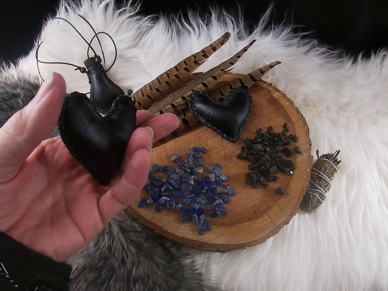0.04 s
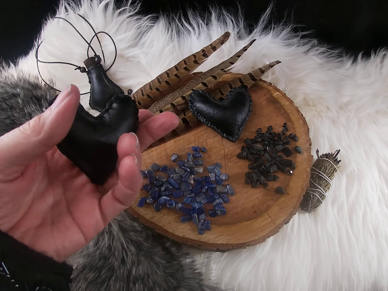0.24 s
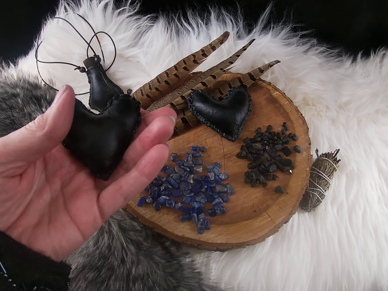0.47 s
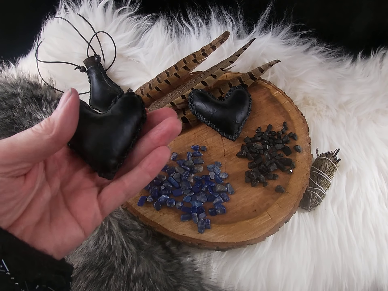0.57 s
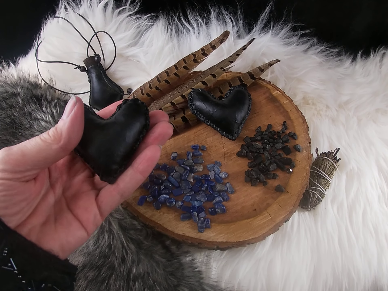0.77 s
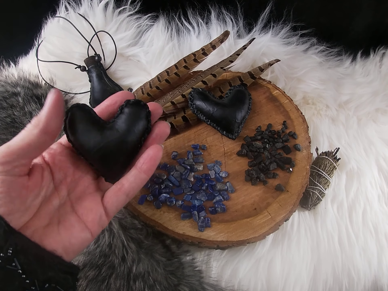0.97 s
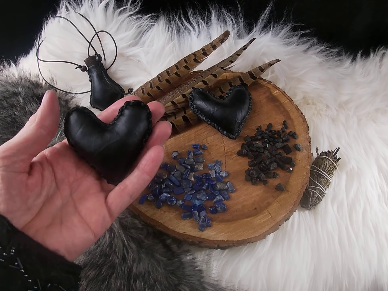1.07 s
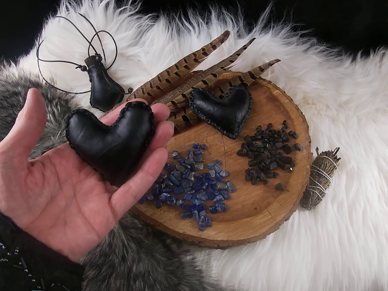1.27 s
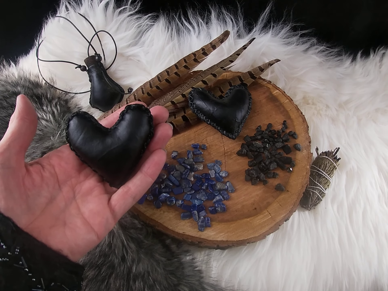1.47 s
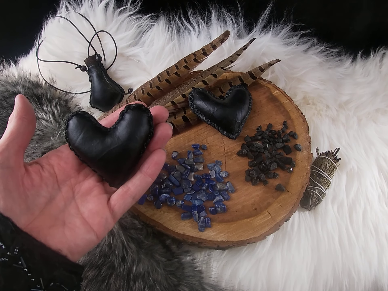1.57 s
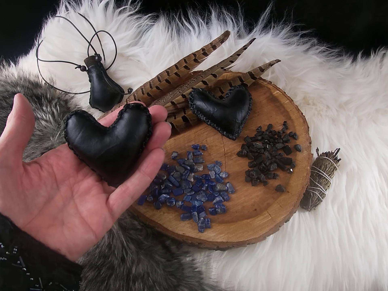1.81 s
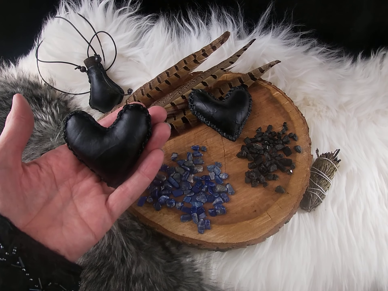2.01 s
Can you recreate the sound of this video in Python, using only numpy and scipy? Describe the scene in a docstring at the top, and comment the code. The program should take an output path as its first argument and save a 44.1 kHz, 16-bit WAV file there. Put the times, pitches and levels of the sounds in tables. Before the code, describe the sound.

Stone chips tumble inside a stiff leathery rattle held in the hand: a quick dense clatter, a few weak ticks, another brief sparse rattle, then only low room rumble and thin hiss, heard close and centred indoors.

```python
"""Rawhide rattle in an open palm

A small rawhide rattle is tipped about in an open palm, close by in a quiet room. Stone chips strike
the stiff hide in short runs of dry clicks: impulses with a brief scratch, filtered by the hide's resonances.
Smaller chips settle between them as random impulses, and the hide slides over the skin as shaped noise.
Rumble, hiss and a faint hum lie underneath, and a nearby echo and a short tail follow the chips."""
import sys
import numpy as np
from scipy import signal
from scipy.fft import rfft, irfft
from scipy.io import wavfile

SR = 44100
rng = np.random.default_rng(int(sys.argv[2]) if len(sys.argv) > 2 else 0)


def materialize(psi):
    """Save the field psi as 16-bit PCM at rate SR to the path in sys.argv[1].

    A 1-D psi becomes a single channel; in a 2-D psi each row is a channel.
    """
    bounded = np.clip(np.atleast_2d(psi).T, -1, 1)
    quanta = np.round(bounded * 32767).astype(np.int16)
    wavfile.write(sys.argv[1], SR, quanta)


N = 90404
TIME = np.arange(N) / SR


def from_db(db):
    """Logarithmic level: decibels to amplitude gain."""
    return 10 ** (np.asarray(db) / 20)


def unit(x):
    """Energy normalization: the squared samples sum to one."""
    return x / np.sqrt(np.sum(x ** 2) + 1e-20)


def rms_one(x):
    """Power normalization: the root mean square becomes one."""
    return unit(x) * np.sqrt(len(x))


def level(curve):
    """Amplitude envelope: gain over time from (time [s], level [dB]) points; silent after the last one."""
    return from_db(np.interp(TIME, *np.transpose(curve), right=-np.inf))


def noise(colour):
    """Spectral shaping: white noise weighted by (frequency [Hz], level [dB]) points, at an rms of one."""
    hz, db = np.transpose(colour)
    bins = np.maximum(np.fft.rfftfreq(N, 1 / SR), 1)
    gain = from_db(np.interp(np.log(bins), np.log(hz), db))
    spectrum = rfft(rng.standard_normal(N)) * gain * (bins > 10)
    return rms_one(irfft(spectrum, N))


def resonate(x, hz, width_hz):
    """Simple resonance: a two-pole filter with a gain of one at its top."""
    alpha = np.tan(np.pi * width_hz / SR)
    c = -2 * np.cos(2 * np.pi * hz / SR)
    return signal.lfilter([alpha, 0, -alpha], [1 + alpha, c, 1 - alpha], x + 1e-18)


def peak(x, hz, width_hz, db):
    """Parallel resonance: raises or lowers one region; its ringing time does not depend on its strength."""
    return x + (from_db(db) - 1) * resonate(x, hz, width_hz)


def band(x, low_hz, high_hz):
    """Band limitation: a Butterworth band-pass."""
    sos = signal.butter(2, [low_hz, min(high_hz, .45 * SR)], "band", fs=SR, output="sos")
    return signal.sosfilt(sos, x)


def edge(x, hz, kind, order):
    """Cutoff slope: a Butterworth high-pass or low-pass."""
    sos = signal.butter(order, min(hz, .45 * SR), kind, fs=SR, output="sos")
    return signal.sosfilt(sos, x + 1e-18)


# spectrum of the quiet room: (frequency [Hz], level [dB])
ROOM_NOISE_COLOUR = [(25, 1.5), (70, -13.5), (105, -20), (138, 2.5), (320, -10.5), (480, -25), (800, -20.5),
                     (1050, -25), (3800, -34), (5500, -30.5), (12500, -49), (16000, -65.5)]
ROOM_NOISE_DB = -60.5


def room_noise():
    """Stationary random noise: a low rumble under a thin hiss."""
    return from_db(ROOM_NOISE_DB) * noise(ROOM_NOISE_COLOUR)


# centres of the brief swells of deep rumble: (time [s])
SWELL_TIMES = [.07, .37, 1.21, 1.843]
SWELL_HZ, SWELL_LENGTH_S, SWELL_DB = 28, .04, -60


def deep_swells():
    """Amplitude modulation: an octave of deep noise under Gaussian envelopes."""
    swelling = sum(np.exp(-((TIME - s) / SWELL_LENGTH_S) ** 2) for s in SWELL_TIMES)
    rumble = band(rng.standard_normal(N), SWELL_HZ / np.sqrt(2), SWELL_HZ * np.sqrt(2))
    return from_db(SWELL_DB) * swelling * rms_one(rumble)


HUM_HZ, HUM_WIDTH_HZ, HUM_DB = 734, 4.2, -80


def faint_hum():
    """Narrow-band resonance: noise through a sharp filter becomes a wavering tone."""
    return from_db(HUM_DB) * rms_one(resonate(rng.standard_normal(N), HUM_HZ, HUM_WIDTH_HZ))


def background():
    """Superposition: the room's noise, deep swells and hum add linearly."""
    return room_noise() + deep_swells() + faint_hum()


# spectrum of the reverberant tail: (frequency [Hz], level [dB])
TAIL_COLOUR = [(1600, 7), (15000, -4)]
ECHO_S, ECHO_DB, ECHO_SMEAR_S = 0.0085, -16, 0.0022   # a nearby surface
ROOM_T60_S, ROOM_DB, ROOM_ONSET_S = 0.1, -22, .02


def room(x):
    """Reflection and reverberation: convolution with one scattered echo and a short decaying tail."""
    echo = unit(rng.standard_normal(N) * np.exp(-np.abs(TIME - ECHO_S) / ECHO_SMEAR_S))
    decay = from_db(-60 * TIME / ROOM_T60_S)   # falls 60 dB in one reverberation time
    onset = 1 - np.exp(-TIME / ROOM_ONSET_S)
    tail = unit(noise(TAIL_COLOUR) * decay * onset)
    response = from_db(ECHO_DB) * echo + from_db(ROOM_DB) * tail
    return x + signal.fftconvolve(x, response)[:N]


# strength of the hide's sliding on skin: (time [s], level [dB])
SLIDE_LEVEL = [(.2, -82.5), (.46, -50), (.59, -72.5), (.685, -53), (.72, -57.5), (.75, -73), (.80, -55),
               (.835, -65.5), (.92, -55), (1.0, -68.5), (1.058, -53), (1.09, -71.5), (1.3, -86)]
# spectrum of the friction: (frequency [Hz], level [dB])
FRICTION_COLOUR = [(500, -41), (900, -14), (2400, -12), (6000, 1), (13400, -20.5), (16000, -52)]


def sliding_hide():
    """Sliding friction: a soft hiss that rises and falls as the rattle shifts on the palm."""
    return level(SLIDE_LEVEL) * noise(FRICTION_COLOUR)


BENDING_HZ, BENDING_WIDTH_HZ = 5200, 3200


def disperse(x):
    """Dispersion of bending waves: all-pass sections delay the middle of the spectrum against its edges."""
    alpha = np.tan(np.pi * BENDING_WIDTH_HZ / SR)
    c = -2 * np.cos(2 * np.pi * BENDING_HZ / SR)
    for _ in range(3):
        x = signal.lfilter([1 - alpha, c, 1 + alpha], [1 + alpha, c, 1 - alpha], x)
    return x


# resonances and valleys of the stitched hide: (frequency [Hz], width [Hz], level [dB])
HIDE_MODES = [(1050, 220, 4), (1680, 260, 11.5), (2410, 850, -15.5), (3930, 220, -7), (4600, 1100, 6),
              (7063, 596, 2), (9496, 1600, -8.5)]
# regions whose strength depends on where a chip lands: (frequency [Hz], width [Hz])
HOLLOW, SHELL, CRACK = (1112, 1000), (3433, 276), (9920, 2750)
BODY_LOW_HZ, BODY_KNEE_HZ, BODY_TOP_HZ = 745, 3000, 6490   # the small body carries little bass and little top


def rattle_body(force, hollow_db, shell_db, crack_db):
    """Modal response: the hide's fixed resonances, coloured by the place of contact."""
    x = edge(force, BODY_LOW_HZ, "high", order=4)
    x = edge(x, BODY_KNEE_HZ, "high", order=1)
    x = edge(x, BODY_TOP_HZ, "low", order=3)
    place = [(*HOLLOW, hollow_db), (*SHELL, shell_db), (*CRACK, crack_db)]
    for hz, width_hz, db in [*HIDE_MODES, *place]:
        x = peak(x, hz, width_hz, db)
    return disperse(x)


CONTACT_WIDTH_HZ, CONTACT_DB = 790, 9


def contact(force, hz):
    """Contact resonance: each impact favours the region around its own pitch."""
    return peak(force, hz, CONTACT_WIDTH_HZ, CONTACT_DB)


# strength of the small chips' settling: (time [s], level [dB])
SETTLE_LEVEL = [(0, -91), (.11, -61.5), (.15, -71), (.25, -53.5), (.305, -55), (.348, -39), (.375, -48.5),
                (.42, -51.5), (.50, -57.5), (.75, -77.5), (.88, -57), (1.13, -69), (1.19, -77)]
SETTLES_PER_S, SETTLE_SPREAD_DB = 2000, 5
SETTLE_HOLLOW_DB, SETTLE_SHELL_DB, SETTLE_CRACK_DB = 9.5, 5.5, 7.5


def settling_chips():
    """Random impulse train: many faint contacts of uneven size, sign and pitch excite the hide."""
    excess_db = SETTLE_SPREAD_DB * np.minimum(rng.exponential(1, N), 3)
    sizes = from_db(excess_db) * rng.choice([-1, 1], N)
    force = sizes * (rng.random(N) < SETTLES_PER_S / SR)
    pitches_hz = [4500, 5100, 6300]
    dealt = rng.integers(0, len(pitches_hz), N)   # which pitch each contact takes
    contacts = sum(contact(force * (dealt == k), hz) for k, hz in enumerate(pitches_hz))
    rung = rattle_body(contacts, SETTLE_HOLLOW_DB, SETTLE_SHELL_DB, SETTLE_CRACK_DB)
    return level(SETTLE_LEVEL) * rms_one(rung)


SCUFF_S, SCUFF_DB, SCUFF_LOW_HZ = 0.0019, -11.5, 6170   # a chip skids for an instant: a bright scratch


def landing_force():
    """Impulsive excitation: a unit click together with a brief skid of high-passed noise."""
    t = TIME[:SR // 30]
    skid = from_db(SCUFF_DB) * rng.standard_normal(len(t)) * np.exp(-(t / SCUFF_S) ** 2)
    force = edge(skid, SCUFF_LOW_HZ, "high", order=2)
    force[0] += 1
    return force


# chip landings: (time [s], level [dB], contact pitch [Hz], hollow boost [dB], shell boost [dB], crack boost [dB])
LANDINGS = [(0.0833, -49.5, 6000.0, 5, 5.0, -8), (0.1744, -49.5, 5940, 11, 2.5, -1.0),
            (0.2051, -19.5, 6200, 1, 14, -6), (0.2421, -31.5, 6200, 6.5, 12, 10),
            (0.2728, -14, 7070, -3, 9, 6), (0.3158, -35, 4240, 1, 2.5, 20),
            (0.3247, -13, 7570, 2, 19.5, 10.5), (0.3285, -21.5, 7350, -2, 11.5, 3),
            (0.3418, -34, 5090.0, -12, 4, 2), (0.3497, -26.5, 6500, 9, 8, 3),
            (0.3639, -30.5, 4270, -3, -8.5, -14), (0.381, -16, 4870, -12, -3, 8.5),
            (0.3818, -21, 4430, -9, 24.5, 5.5), (0.4046, -21, 5820.0, 3, 15, -8),
            (0.4098, -29, 5430, -9, -0.5, -5), (0.41, -22.5, 4917, -2, 7, 2),
            (0.414, -32.5, 5650, 5, 6, -2), (0.4181, -25.5, 4500, -7, -5.5, 11),
            (0.4211, -29, 6170, 2, -15, 7.5), (0.431, -13.5, 4750, 10.5, 13.5, 3.5),
            (0.4576, -18, 4550.0, -1.5, 11, 21.5), (0.4619, -27.5, 6340, 6.5, 11, 12),
            (0.4658, -27.5, 4450, 4, 6, 4.0), (0.4698, -32, 5300, -5, 26, 4),
            (0.5486, -43.0, 5400, 26, -5, 5), (0.5687, -40, 4830, 17, 8, 11),
            (0.603, -34.5, 4840.0, 14, 19, 20), (0.6079, -26, 4800, 2.5, 9, 15),
            (0.619, -36.5, 4900, 26.5, 17, 9), (0.8456, -19.5, 7680, 2, 8, 19.5),
            (0.8728, -35.5, 4270, -11, 8.5, 9), (0.9001, -38, 4250.0, 2, 7, 2),
            (0.9108, -25.5, 5580.0, 3, 8, 4), (0.916, -24.0, 5900, -20, -12, 14),
            (0.922, -23.5, 5850, -1, 9.5, 13.5), (0.9427, -39.5, 6440.0, 1, 4, 2),
            (0.9472, -38.5, 6040.0, -3, -4, 14), (1.014, -40, 6100, 14.5, 4, 6),
            (1.0368, -27.5, 5930, -3, -4, 15.5), (1.1256, -50.5, 6000, 19, 0, 10)]


def landing_chips():
    """Impact response: each landing rings through the hide, its energy that of 1 ms at the given level."""
    out = np.zeros(N + SR)
    millisecond = SR / 1000   # in samples
    for s, db, hz, hollow_db, shell_db, crack_db in LANDINGS:
        force = contact(landing_force(), hz)
        click = unit(rattle_body(force, hollow_db, shell_db, crack_db))
        start = int(s * SR)
        out[start:start + len(click)] += from_db(db) * np.sqrt(millisecond) * click
    return out[:N]


SIDE_DB = -40.5


def scene():
    """Superposition: all is centred, with only a trace of left-right difference in the treble."""
    chips = landing_chips() + settling_chips()
    mid = room(chips) + sliding_hide() + background()
    side = from_db(SIDE_DB) * band(mid, low_hz=9000, high_hz=16000)
    return np.array([mid + side, mid - side])


TREBLE_ROLL_HZ, CUTOFF_HZ = 13600, 16400


def record(dry):
    """Band limitation: the microphone's top treble rolls off, then is cut steeply."""
    soft = edge(dry, TREBLE_ROLL_HZ, "low", order=4)
    steep = signal.ellip(10, .2, 70, CUTOFF_HZ, fs=SR, output="sos")   # ripple .2 dB, stopband 70 dB down
    return signal.sosfilt(steep, soft)


dry = scene()
out = record(dry)
materialize(out)
```